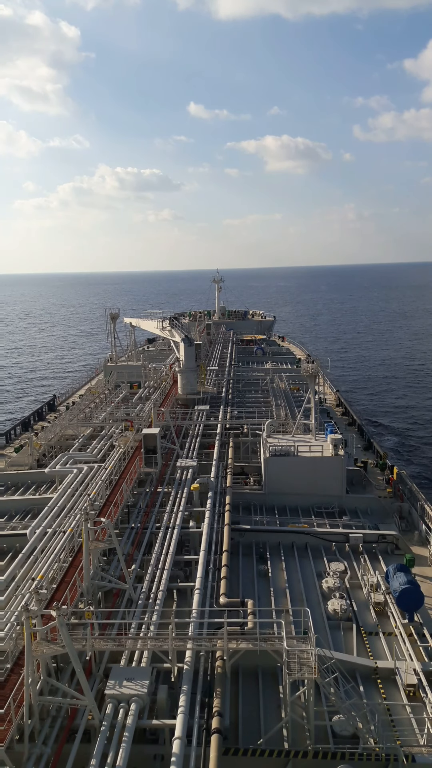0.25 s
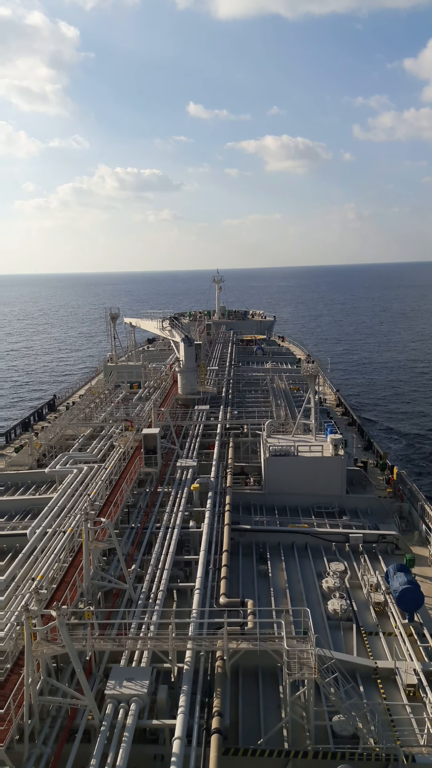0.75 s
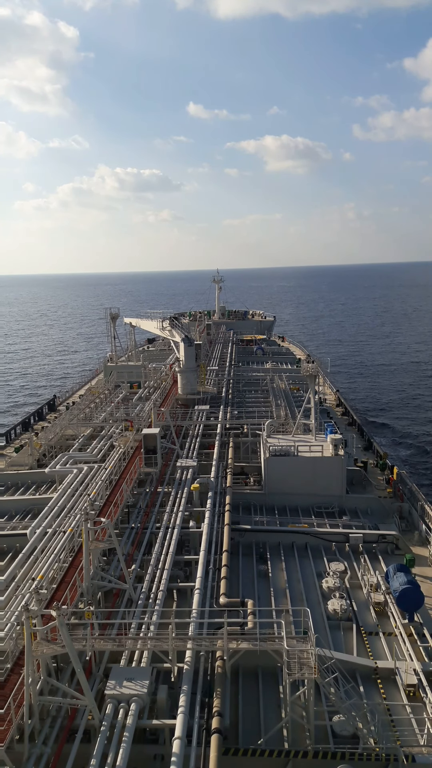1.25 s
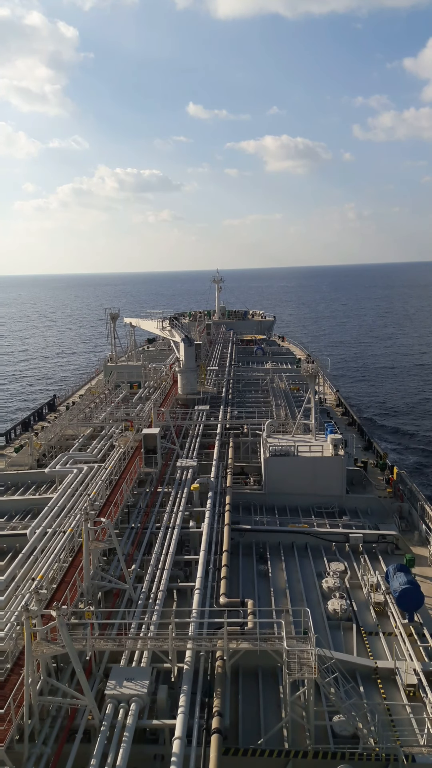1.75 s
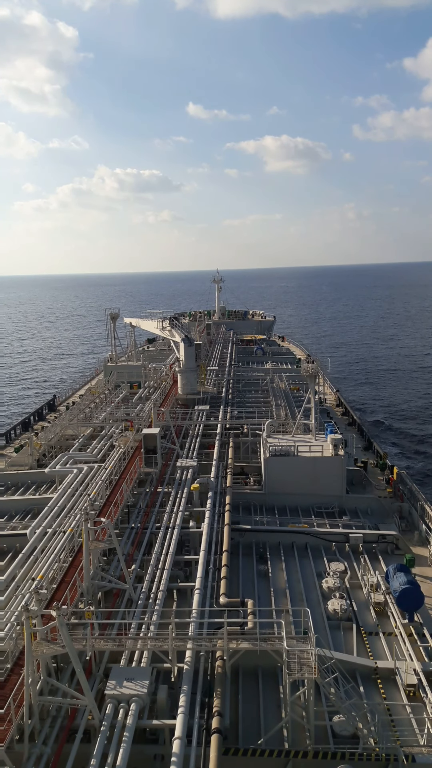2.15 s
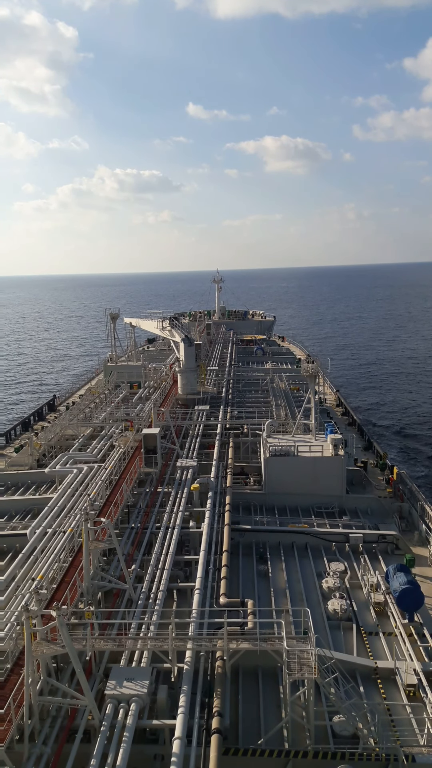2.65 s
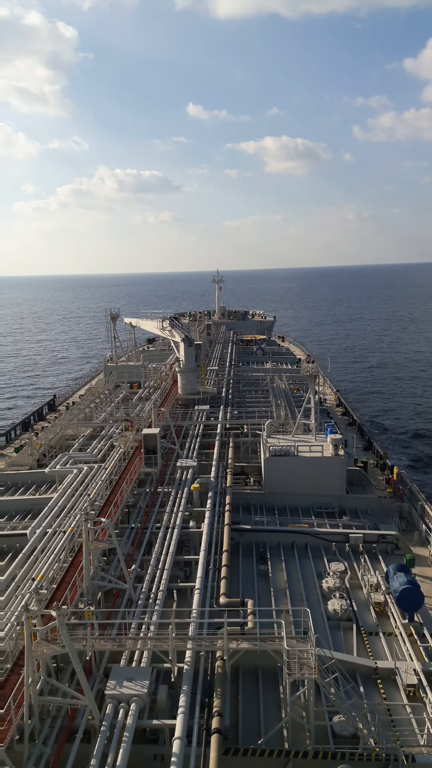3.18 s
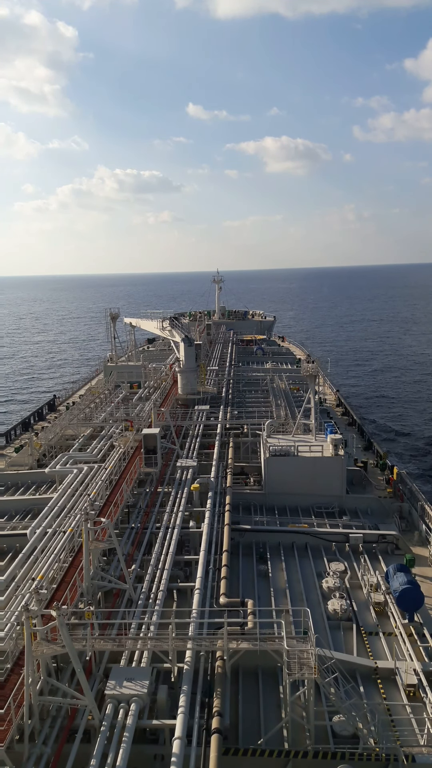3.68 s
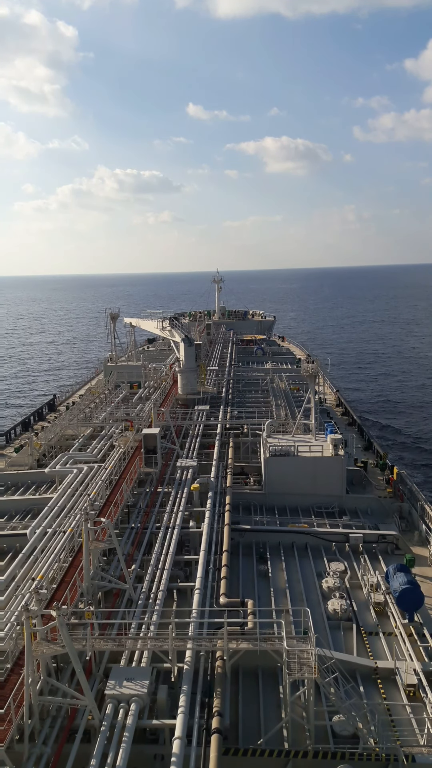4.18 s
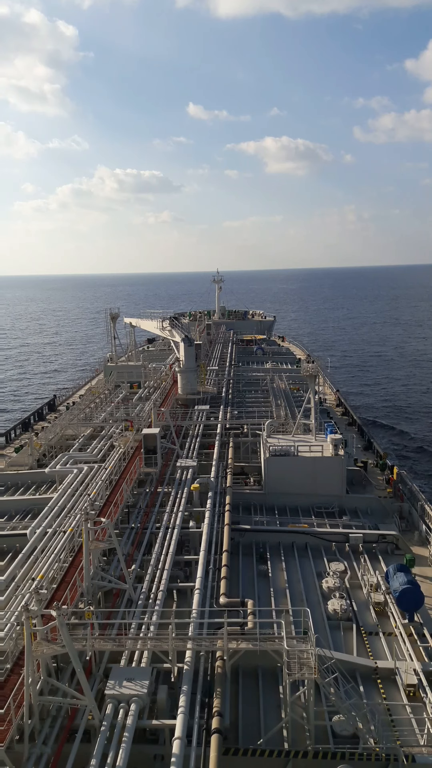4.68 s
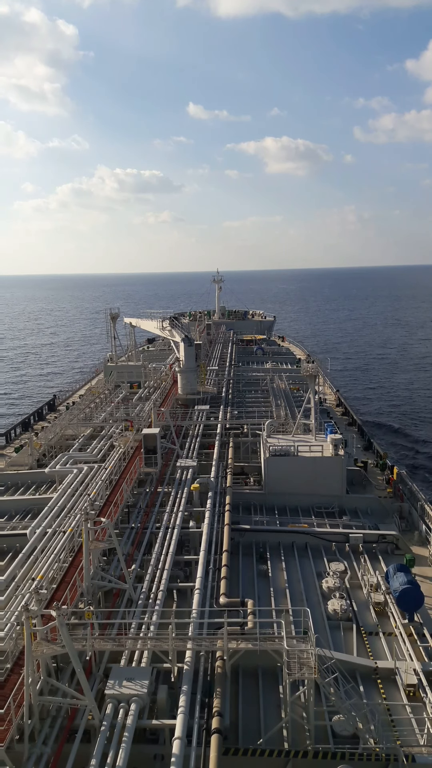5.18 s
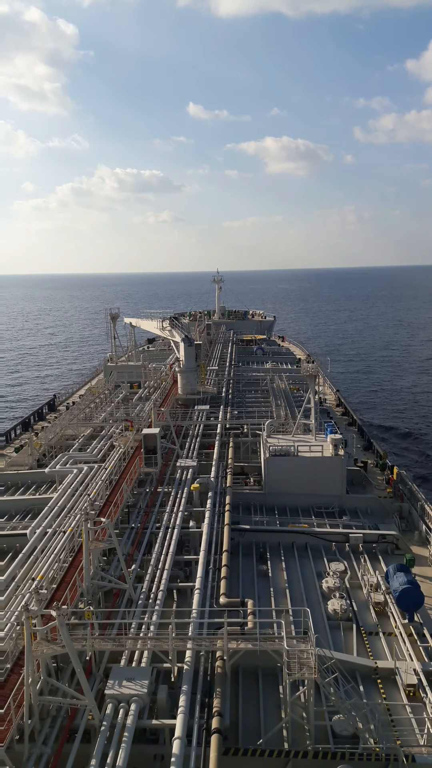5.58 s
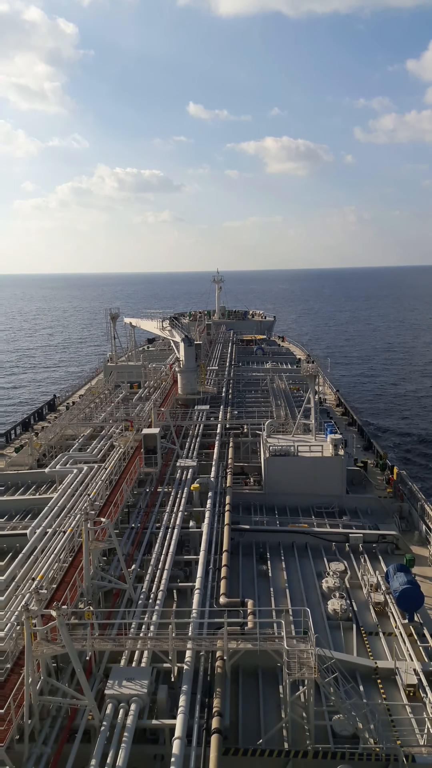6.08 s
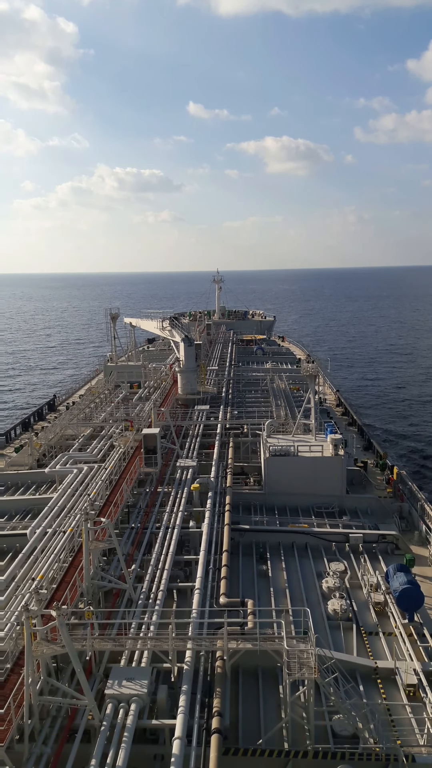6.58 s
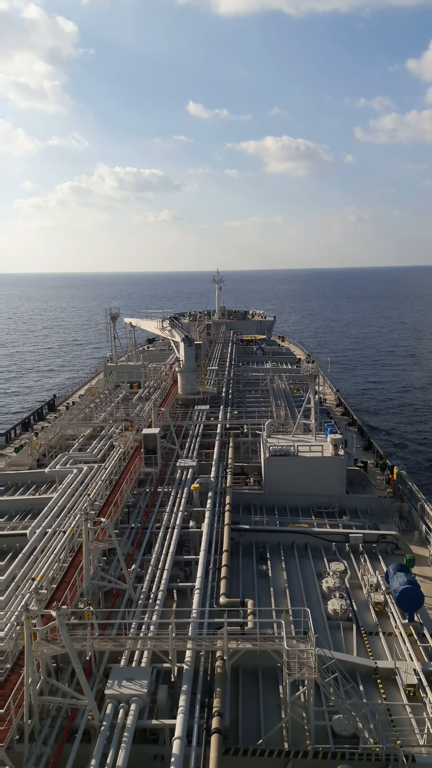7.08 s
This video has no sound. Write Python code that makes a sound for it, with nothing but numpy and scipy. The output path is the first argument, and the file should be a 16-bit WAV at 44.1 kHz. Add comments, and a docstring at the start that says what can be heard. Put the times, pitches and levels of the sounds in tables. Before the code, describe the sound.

From 0 seconds a large tanker's machinery is already running at full strength, and it continues unbroken to about 7.3 seconds. A diesel generator throbs in the bass, its low tones around 55 to 120 hertz pulsing together over a broad exhaust rumble. Big fans hum near 180, 200 and 428 hertz, each wavering and beating, swelling and dipping several times a second. Thinner blower tones around 463 and 666 hertz come and go, the lower one lifting near 0.5, 2 and 5 seconds, with faint pump tones behind. Air roars from louvres and blurry ringing ducts, easing very slightly over the first four seconds. A soft fine hiss rides above. Barely audible tiny ticks are scattered throughout, strongest near 4.4 seconds, while a very faint top hiss first swells near 2.7. The perspective is fixed, the treble dull, and the sound stops without a fade.

```python
"""High above the deck of a tanker under way on a calm sea; all the machinery runs from start to end.
From the start a diesel generator throbs in the bass as a row of low tones, over a rumble of shaped noise.
Big fans hum, each blade tone beating against its own flutter; blowers and pumps add thinner wavering tones.
Air roars as shaped noise and ringing ducts, easing slightly over the first four seconds.
Tiny filtered clicks tick throughout; the faint top hiss first swells near 2.7 s and the loudest tick is near 4.4 s."""
import sys
import numpy as np
from scipy import signal
from scipy.fft import rfft, irfft, next_fast_len
from scipy.io import wavfile
from scipy.ndimage import uniform_filter1d

SR = 44100
rng = np.random.default_rng(int(sys.argv[2]) if len(sys.argv) > 2 else 0)


def materialize(psi):
    """Save the field psi as 16-bit PCM at rate SR to the path in sys.argv[1].

    A 1-D psi becomes a single channel; in a 2-D psi each row is a channel.
    """
    bounded = np.clip(np.atleast_2d(psi).T, -1, 1)
    quanta = np.round(bounded * 32767).astype(np.int16)
    wavfile.write(sys.argv[1], SR, quanta)


N = 323465   # length in samples, about 7.33 s


def from_db(db):
    """Turn decibels into a gain."""
    return 10 ** (np.asarray(db) / 20)


def rms_one(x):
    """Scale a signal so that its average power is one."""
    return x / np.sqrt(np.mean(np.abs(x) ** 2) + 1e-20)


def in_time(rows):
    """Draw straight lines between the rows of a curve table, giving each column at every sample."""
    t, *columns = np.transpose(rows)
    return [np.interp(np.arange(N) / SR, t, column) for column in columns]


def drift(rate_hz, step=40):
    """Slow random wandering with an rms of one: coarse noise smoothed twice by a one-pole low-pass."""
    pole = np.exp(-2 * np.pi * rate_hz * step / SR)
    coarse = rng.standard_normal(N // step + 4002)
    slow = signal.lfilter([1], [1, -2 * pole, pole * pole], coarse)
    slow = slow[4000:]   # the filter has settled by here
    return np.interp(np.arange(N) / step, np.arange(len(slow)), rms_one(slow))


def flutter(width_hz):
    """Random strength and phase of a tone stirred by turbulence; a larger width flutters faster."""
    rate_hz = width_hz * np.pi / 4
    return rms_one(drift(rate_hz) + 1j * drift(rate_hz))


def evened(strength, span_s):
    """Hold the slow power of a fluttering tone at one, keeping only its quick changes."""
    slow_power = uniform_filter1d(np.abs(strength) ** 2, int(span_s * SR))
    return strength / np.sqrt(slow_power)


def tone(hz, strength):
    """A sine of steady or moving pitch; the complex strength sets its rms and phase."""
    turns = np.cumsum(hz * np.ones(N)) / SR + rng.random()
    return np.sqrt(2) * np.real(strength * np.exp(2j * np.pi * turns))


def noise(spectrum):
    """Steady random noise, shaped so that each frequency has the power the table asks for."""
    hz, db = np.transpose(spectrum)
    size = next_fast_len(N)
    grid = np.maximum(np.arange(size // 2 + 1) * SR / size, 1)
    gain = from_db(np.interp(np.log(grid), np.log(hz), db))
    gain = gain / np.maximum(grid / hz[-1], 1) ** 4   # dies away above the last point
    white = rng.standard_normal(size)
    return irfft(rfft(white) * gain, size)[:N] * np.sqrt(SR / 2)


# shape of the very faint top hiss; only the differences count: f/Hz, level/dB (per Hz)
HISS_SHAPE = [(6000, -140), (8500, -124), (11000, -118), (14000, -115), (16000, -117)]
# how loud that hiss is as it swells: t/s, level/dB (rms)
HISS_SWELL_CURVE = [(0.1, -79), (1.1, -79), (2.35, -79), (2.71, -75.5), (2.93, -77.5), (3.46, -75),
                    (3.85, -75.5), (4.53, -78.5), (6.4, -77), (7.2, -78.5)]
# tiny treble ticks, as clicks before the lift and the filters: t/s, level/dB (peak)
TICK_TIMES = [(0.9723, -56), (1.4932, -58), (1.646, -55.5), (2.4748, -59), (2.646, -57), (2.7484, -54),
              (2.7985, -54), (2.879, -60), (3.3265, -61), (3.4318, -55), (3.8249, -60), (3.8378, -55.5),
              (4.3543, -51), (4.6848, -55), (5.4427, -56), (5.6585, -57), (5.8, -61), (5.9218, -55),
              (5.959, -64), (5.9994, -57), (6.6915, -57), (6.9827, -60.5)]
CRACKLES_PER_S = 18   # at the hiss's average (rms) level
CRACKLE_DB, CRACKLE_SPREAD_DB = -60, 5   # lowest click before the filters, and its random rise
TICK_RING_HZ, TICK_RING_Q, TICK_RING_DB = 14000, 12, -2.5   # the ticks' brief ring


def treble_fizz(tick_lift_db=14, edge_hz=10500):
    """Faint top hiss with high-passed, briefly ringing clicks; the crackle thickens as the hiss swells."""
    swell = from_db(in_time(HISS_SWELL_CURVE)[0])
    chance = CRACKLES_PER_S * rms_one(swell) ** 4 / SR
    born = rng.random(N) < chance
    rise = np.minimum(rng.exponential(1, N), 3)
    clicks = born * from_db(CRACKLE_DB + CRACKLE_SPREAD_DB * rise)
    for t, db in TICK_TIMES:
        clicks[int(t * SR)] = from_db(db + tick_lift_db)
    high_pass = signal.butter(4, edge_hz, "high", fs=SR, output="sos")
    ticks = signal.sosfilt(high_pass, clicks + 1e-18)
    ring = signal.lfilter(*signal.iirpeak(TICK_RING_HZ, TICK_RING_Q, fs=SR), ticks)
    hiss = rms_one(noise(HISS_SHAPE)) * swell
    return ticks + from_db(TICK_RING_DB) * ring + hiss


# faint tones of the pumps: f/Hz, flutter width f/Hz, level/dB (rms)
PUMP_TONES = [(262.3, 1.6, -44.5), (499, 2.2, -48), (1164, 3.1, -57.5)]


def pumps():
    """Thin tones behind the fans; their slow flutter leaves the pitch nearly steady."""
    return sum(tone(hz, from_db(db) * flutter(width_hz)) for hz, width_hz, db in PUMP_TONES)


# the two blowers, lower then upper: f/Hz, flutter width f/Hz, trim level/dB
BLOWER_TONES = [(463, 9, -0.2), (665.6, 15, -4.5)]
# slow swells of the lower and upper blower, before the trim: t/s, level/dB
LOW_BLOWER_SWELL = [(0.0, -41.5), (0.45, -44), (0.54, -35), (0.78, -38.0), (0.99, -41), (1.8, -44.5),
                    (2.01, -33.5), (2.22, -41), (2.37, -35.5), (2.73, -39), (4.81, -40), (5.11, -32),
                    (5.32, -40), (7.33, -42)]
HIGH_BLOWER_SWELL = [(0, -37.5), (0.6, -32), (1.0, -38), (1.85, -29.5), (2.1, -34), (2.9, -31.5),
                     (3.3, -35.5), (3.8, -30.5), (4.5, -34), (4.75, -38), (7.33, -43)]


def blowers(swell_s=0.27):
    """Smaller machines, each with one wavering tone that swells and fades on its own."""
    out = np.zeros(N)
    for (hz, width_hz, trim_db), curve in zip(BLOWER_TONES, (LOW_BLOWER_SWELL, HIGH_BLOWER_SWELL)):
        level = from_db(in_time(curve)[0] + trim_db)
        out += tone(hz, evened(flutter(width_hz), swell_s) * level)
    return out


# exhaust and machinery rumble: f/Hz, level/dB (per Hz)
RUMBLE_SPECTRUM = [(15, -89), (36, -78.5), (50, -63), (80, -61), (102, -56), (118, -56.5), (140, -58),
                   (160, -59.5), (215, -55), (320, -61), (600, -82.5)]


def rumble():
    """Exhaust and machinery blend into a steady low noise without any pitch."""
    return noise(RUMBLE_SPECTRUM)


# duct resonances stirred by the flow, average level: f/Hz, flutter width f/Hz, level/dB (rms)
DUCT_RINGS = [(173, 4, -45.5), (187, 5, -47.5), (212.8, 5, -47.5), (238, 6.2, -51.5), (284, 7, -52.5),
              (357.5, 8.5, -46.5), (402, 9, -47.5), (421, 7, -46), (447, 3.3, -50.5), (566.5, 45, -42),
              (636.2, 22, -40), (694.7, 40, -40), (850, 42, -41.5), (926, 33, -48.5), (980.5, 55, -44.5),
              (2087, 300, -60)]
# air roaring from the louvres, average level: f/Hz, level/dB (per Hz)
AIR_SPECTRUM = [(150, -78.5), (300, -63), (410, -55), (490, -59), (590, -57), (780, -59.5), (1000, -65),
                (1060, -67.5), (1140, -68.5), (1230, -71), (1420, -72.5), (1900, -78), (2250, -81.5),
                (2450, -85), (3500, -96)]
# the roar eases slightly; only the changes count: t/s, level/dB
FLOW_CURVE = [(0, -28.5), (1.0, -29), (2.5, -29), (4.0, -29.5), (5.6, -29.5), (7.33, -29.5)]
# finer hiss of small eddies, before its level curve: f/Hz, level/dB (per Hz)
EDDY_SPECTRUM = [(1500, -115), (2700, -88.5), (3500, -87), (4600, -92.5), (5700, -97), (6400, -104.5),
                 (7500, -107)]
# rise and fall of the eddies' hiss: t/s, level/dB
EDDY_CURVE = [(0, -1.5), (0.8, -0.1), (1.8, -2.3), (2.8, 0), (4.3, -0.4), (5.8, 0), (7.33, -1)]
GUST_DB, GUST_HZ = 0.12, 2.3   # small random gusts: rms depth and rate


def airflow():
    """Turbulent air rings the ducts and rushes from the louvres; light gusts move roar and hiss together."""
    gusts = from_db(GUST_DB * drift(GUST_HZ))
    flow = rms_one(from_db(in_time(FLOW_CURVE)[0]))
    ducts = sum(tone(hz, from_db(db) * flutter(width_hz)) for hz, width_hz, db in DUCT_RINGS)
    roar = (ducts + noise(AIR_SPECTRUM)) * flow
    eddy_hiss = noise(EDDY_SPECTRUM) * from_db(in_time(EDDY_CURVE)[0])
    return gusts * (roar + eddy_hiss)


# generator exhaust tones, before their small unevenness: multiple of the cycle rate, level/dB (rms)
GENERATOR_TONES = [(7, -65), (8, -67.5), (9, -43), (10, -51), (11, -43), (12, -36), (18, -37.5),
                   (19, -51.5), (20, -47), (23, -55.5)]
CYCLE_HZ = 5.986   # four-stroke working cycles per second, near 720 rpm


def generator(uneven_db=0.36, sway_s=0.00026):
    """Governed diesel: unequal cylinders put tones at multiples of the cycle rate, which throb together."""
    lag = sway_s * drift(0.46)   # one slow timing sway shared by all the tones
    out = np.zeros(N)
    for order, db in GENERATOR_TONES:
        level = from_db(db + uneven_db * drift(2))
        sway = np.exp(2j * np.pi * order * CYCLE_HZ * lag)
        out += tone(round(order) * CYCLE_HZ, level * sway)
    return out


# turbulence on the low, main and high fan:
# pitch wander f/Hz (rms), flutter width f/Hz, flutter level/dB (against the steady tone), trim level/dB
FAN_TURBULENCE = [(2.2, 24, -6.5, -0.1), (0.695, 20, -11.5, 0.2), (1.8, 20, -6.5, 0.26)]
# blade tones that swell and waver in the moving air, before deepening, trim and wander: t/s, level/dB, f/Hz
LOW_FAN_CURVE = [(0.0, -28.5, 181), (0.27, -41.5, 178), (0.39, -30, 178), (0.479, -38, 180),
                 (0.6, -26.5, 178), (0.87, -34.5, 181), (1.05, -27.5, 181), (1.14, -46, 182),
                 (1.26, -30.0, 183), (1.59, -37.5, 178), (1.92, -32, 179), (2.01, -45, 180),
                 (2.13, -28.5, 181), (2.25, -31, 182), (2.43, -43, 178), (2.52, -32.5, 178),
                 (2.7, -33.5, 177), (2.97, -44.5, 185), (3.09, -27.5, 176), (3.21, -33.5, 182),
                 (3.73, -29.0, 177), (4.09, -39, 181), (4.18, -32.5, 178), (4.99, -32.5, 181),
                 (5.05, -40.5, 179), (5.74, -30.5, 179), (5.98, -35.0, 179), (6.041, -28.5, 178),
                 (6.25, -39, 180), (6.4, -37, 175), (7.0, -33.5, 186), (7.21, -29, 183), (7.33, -32, 183)]
MAIN_FAN_CURVE = [(0.0, -36.5, 197), (0.12, -28.5, 201), (0.21, -41.5, 198), (0.63, -45, 200),
                  (0.78, -30.5, 201), (1.11, -33, 200), (1.2, -36, 198.6), (1.29, -30.5, 200),
                  (1.5, -41.5, 206), (1.68, -30.0, 202), (1.83, -43, 199.4), (1.98, -27.5, 202.3),
                  (2.1, -40, 201), (2.16, -30, 199), (2.25, -28.5, 202), (2.43, -34.5, 202),
                  (2.85, -28.5, 200), (3.06, -44, 201.4), (3.12, -33, 197.4), (3.45, -35, 199.7),
                  (4.3, -30, 199.4), (4.39, -39, 204), (4.63, -27.5, 200), (4.81, -41.5, 198),
                  (4.9, -25.5, 200), (5.02, -41.5, 201.6), (5.14, -27.5, 202), (5.23, -40, 199.6),
                  (5.47, -31.5, 201.5), (5.53, -41, 202.5), (5.74, -30.5, 207.3), (5.83, -44.5, 200.5),
                  (6.4, -29.5, 200.4), (6.55, -42.5, 198.7), (6.7, -26.5, 202.4), (6.91, -38.5, 198),
                  (7.12, -29, 200), (7.33, -34.5, 197.2)]
HIGH_FAN_CURVE = [(0.0, -36, 432), (0.15, -41, 428), (0.931, -41.5, 429), (1.11, -30.5, 426),
                  (1.62, -39.5, 428), (1.83, -28.5, 425), (1.95, -39.0, 432), (2.22, -33, 421),
                  (2.4, -32.5, 432), (2.58, -45, 426), (3.73, -32.5, 428), (3.85, -44, 423),
                  (4.6, -33.5, 425), (4.66, -41.0, 428), (4.78, -30, 428), (5.11, -41, 430),
                  (5.2, -30.5, 428), (5.29, -40, 419), (5.47, -43, 436), (5.62, -33.5, 427),
                  (6.13, -40, 425), (6.37, -33.5, 428), (6.82, -41.5, 426), (6.97, -32.5, 425),
                  (7.06, -46, 425), (7.33, -33, 427)]
SWELL_DEPTH = 1.15   # stretches the dB swells about their average


def fans(wander_rate_hz=2.75, swell_s=0.32):
    """Each blade tone wanders in pitch and beats against its own turbulent flutter; slow swells set its level."""
    out = np.zeros(N)
    curves = (LOW_FAN_CURVE, MAIN_FAN_CURVE, HIGH_FAN_CURVE)
    for (wander_hz, width_hz, flutter_db, trim_db), curve in zip(FAN_TURBULENCE, curves):
        level_db, hz = in_time(curve)
        swell_db = level_db.mean() + SWELL_DEPTH * (level_db - level_db.mean())
        beating = evened(1 + from_db(flutter_db) * flutter(width_hz), swell_s)
        pitch = hz + wander_hz * drift(wander_rate_hz)
        out += tone(pitch, beating * from_db(swell_db + trim_db))
    return out


def scene():
    """All the machinery, heard from one fixed place."""
    return (pumps() + blowers() + rumble() + airflow() + generator() + fans())[None]


MIC_TOP_HZ, CUTOFF_HZ = 6610, 15500   # where the microphone's treble falls, and the final cut-off
FADE_IN_S = 0.004


def record(dry):
    """The microphone loses the treble steeply; only a faint fizz lies above, up to the cut-off."""
    opened = dry * np.minimum(np.arange(N) / SR / FADE_IN_S, 1)
    dull = signal.sosfilt(signal.butter(12, MIC_TOP_HZ, fs=SR, output="sos"), opened)
    cut_off = signal.ellip(12, .1, 90, CUTOFF_HZ, fs=SR, output="sos")
    return signal.sosfilt(cut_off, dull + treble_fizz())


dry = scene()
out = record(dry)
materialize(out)
```